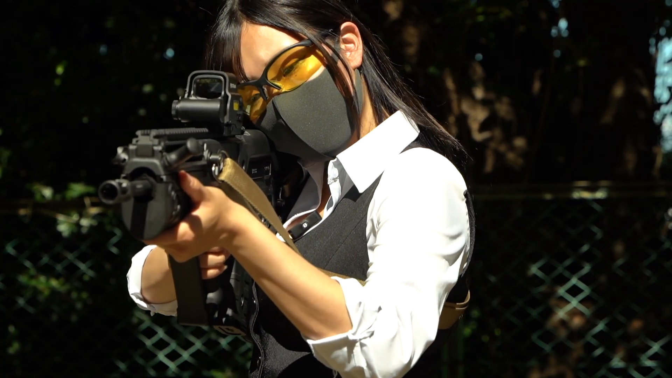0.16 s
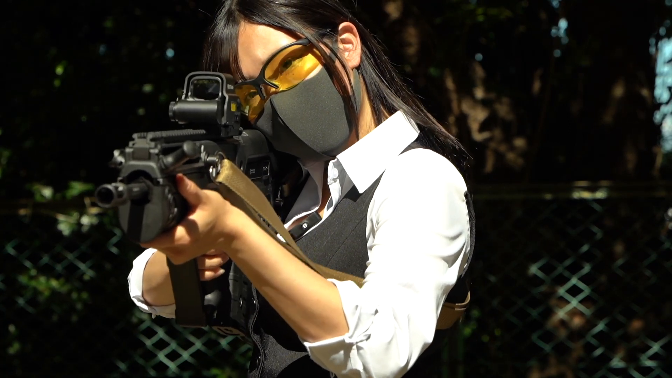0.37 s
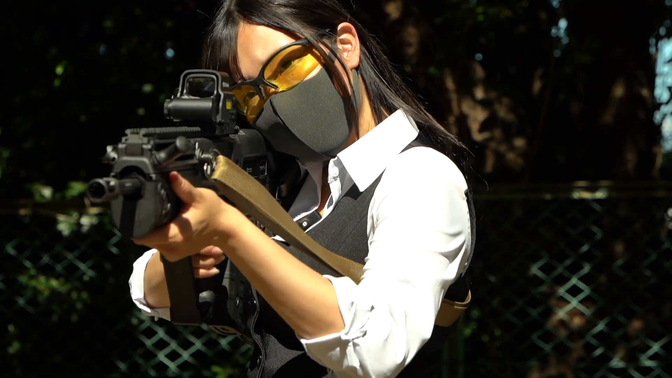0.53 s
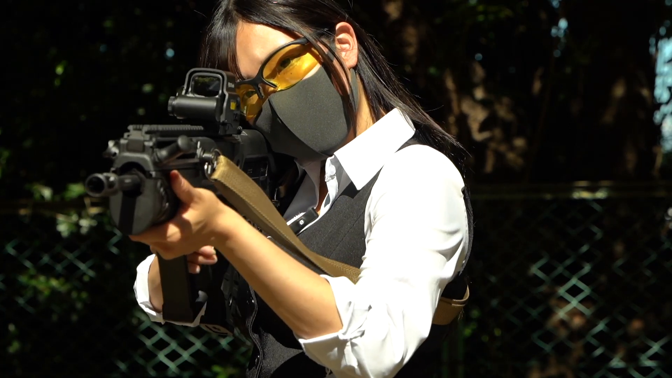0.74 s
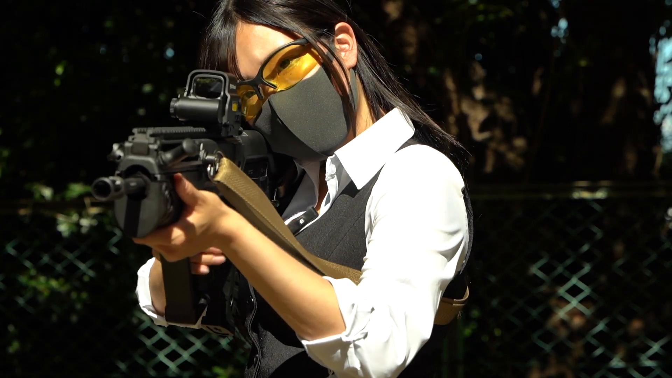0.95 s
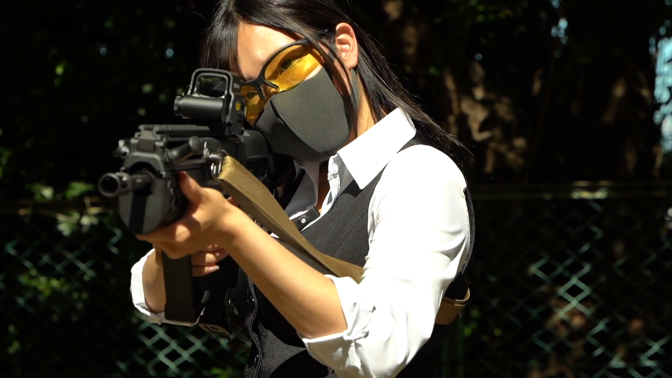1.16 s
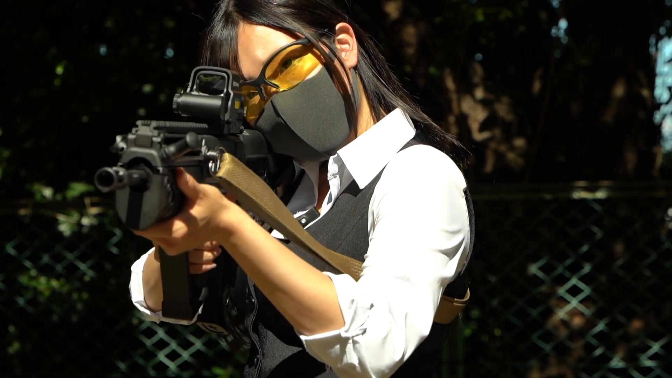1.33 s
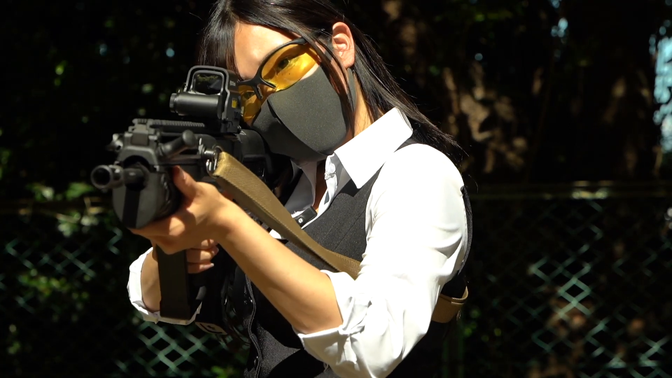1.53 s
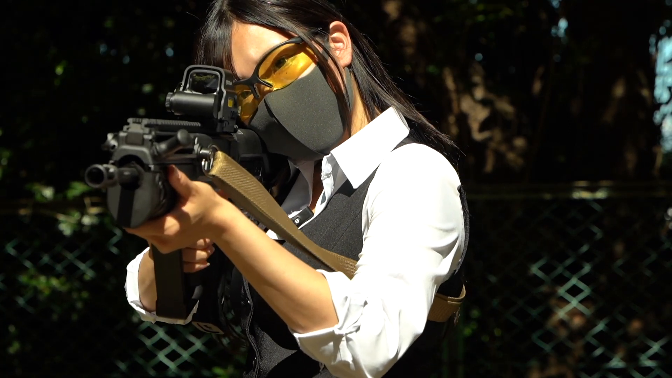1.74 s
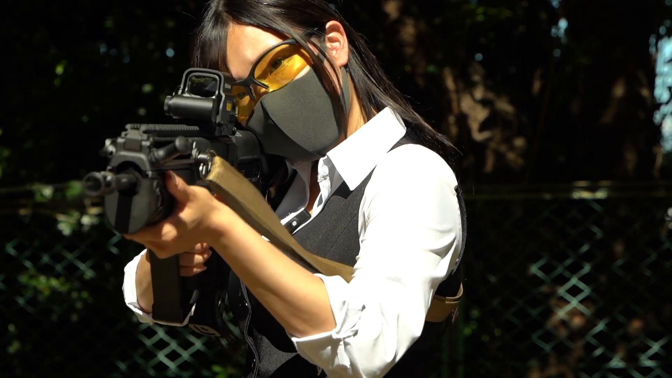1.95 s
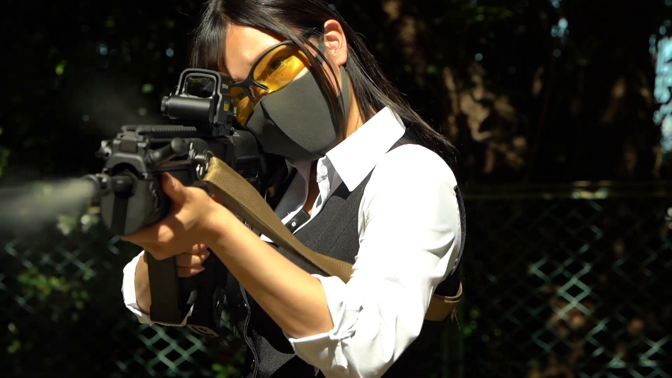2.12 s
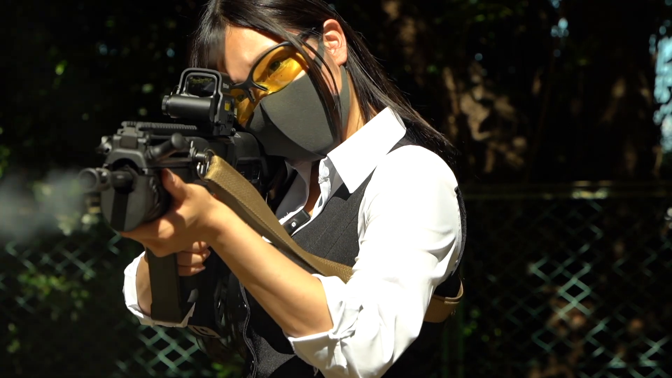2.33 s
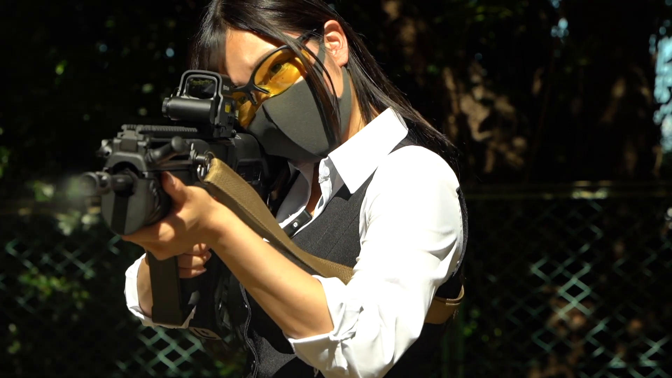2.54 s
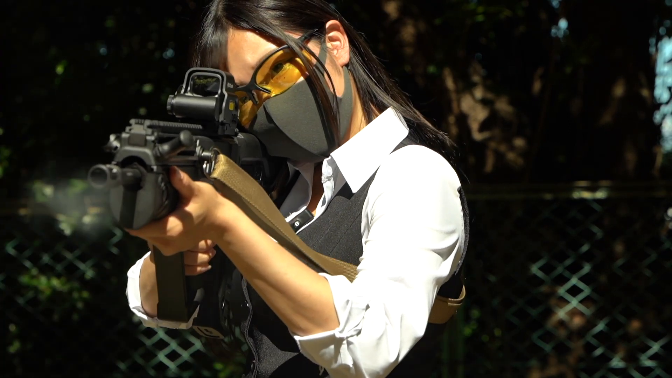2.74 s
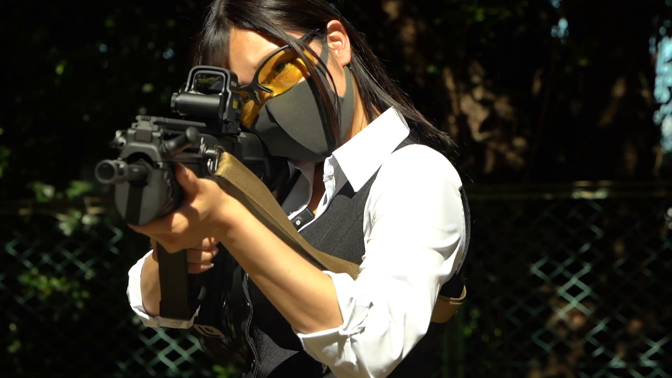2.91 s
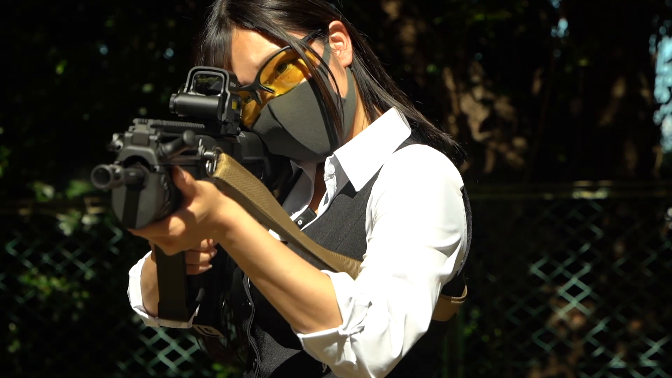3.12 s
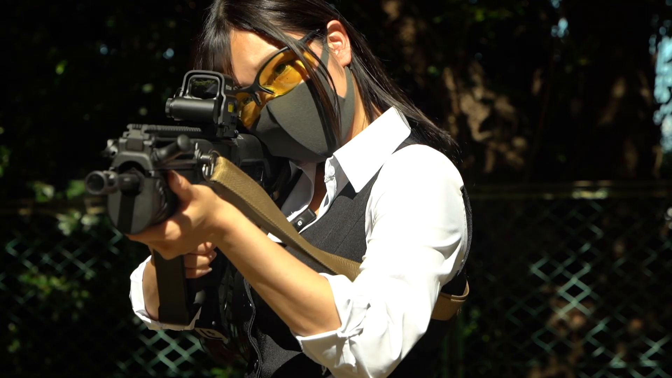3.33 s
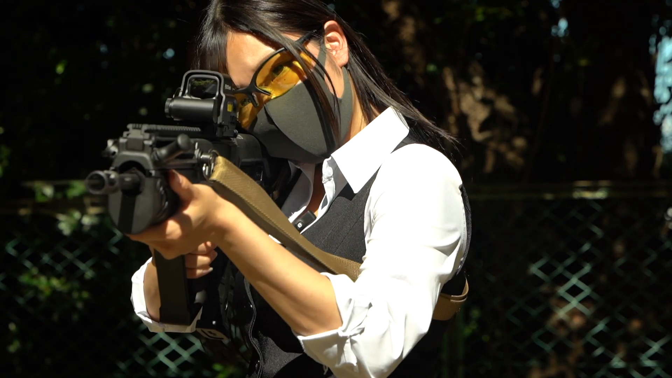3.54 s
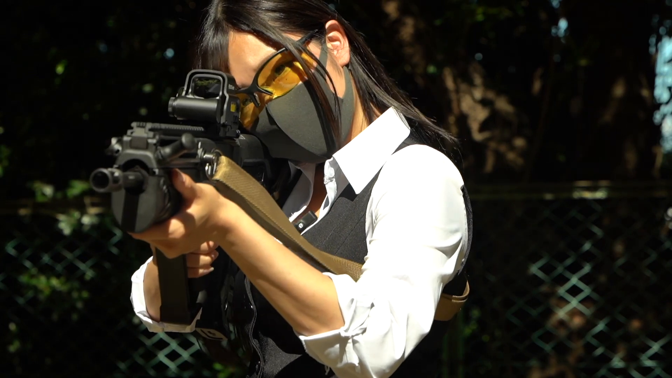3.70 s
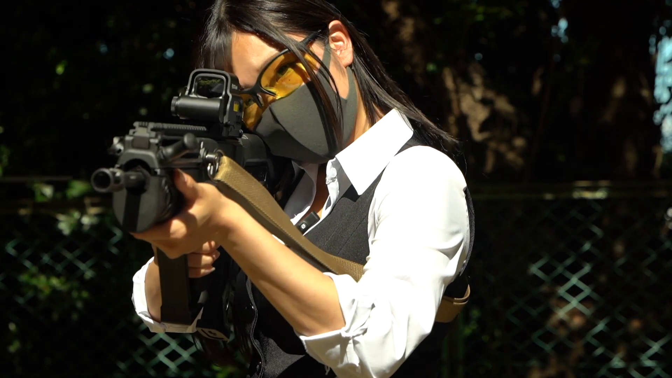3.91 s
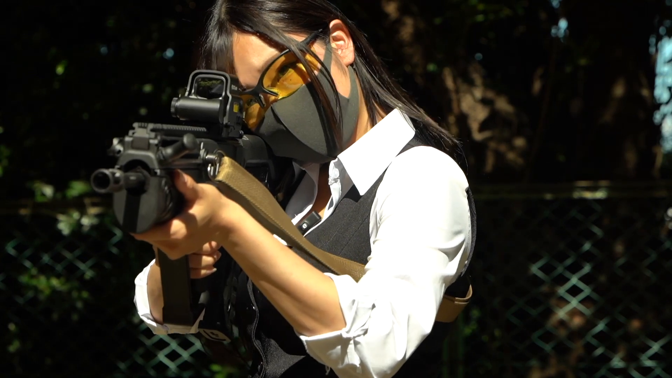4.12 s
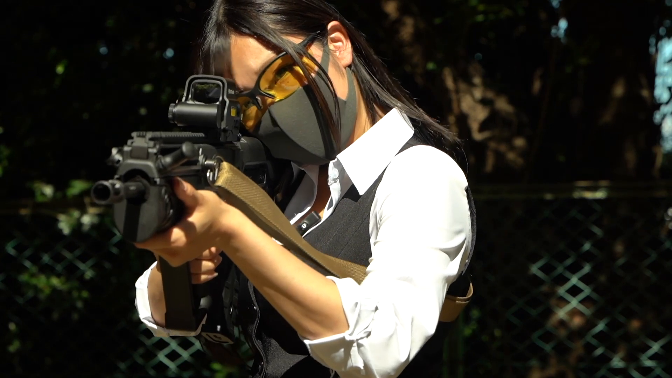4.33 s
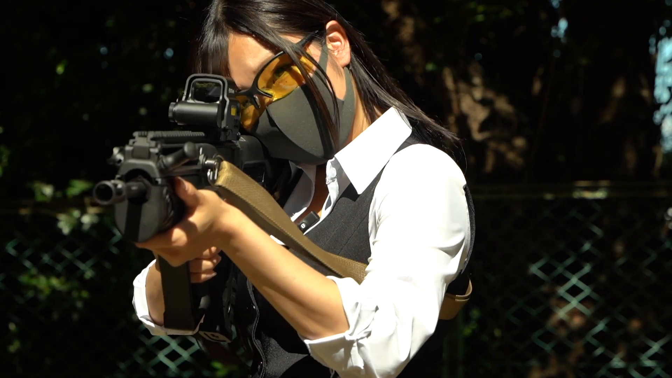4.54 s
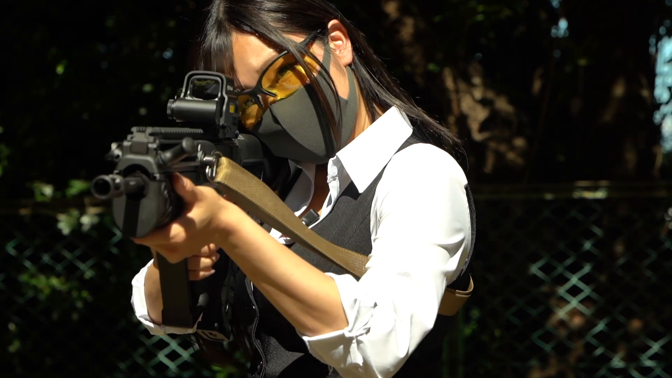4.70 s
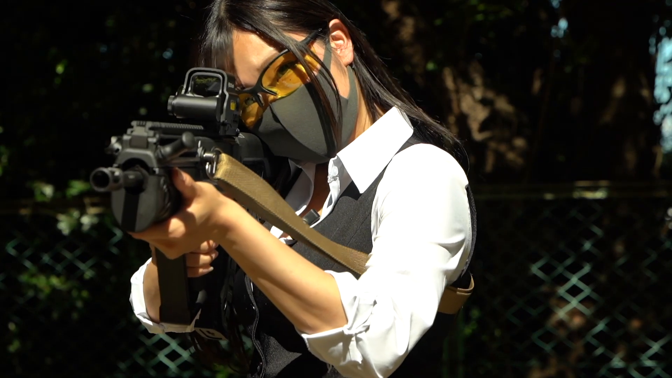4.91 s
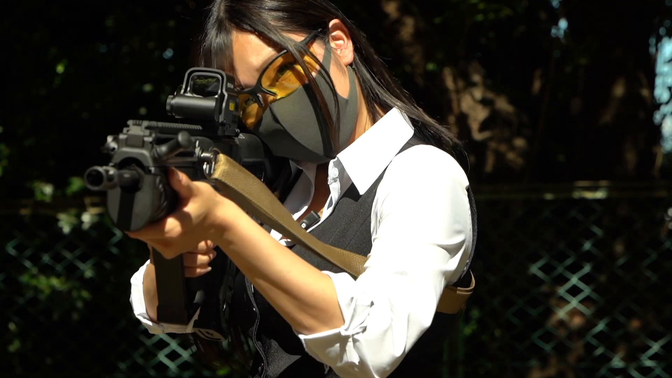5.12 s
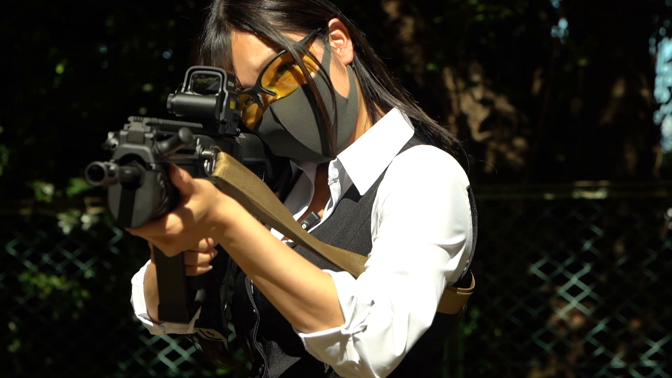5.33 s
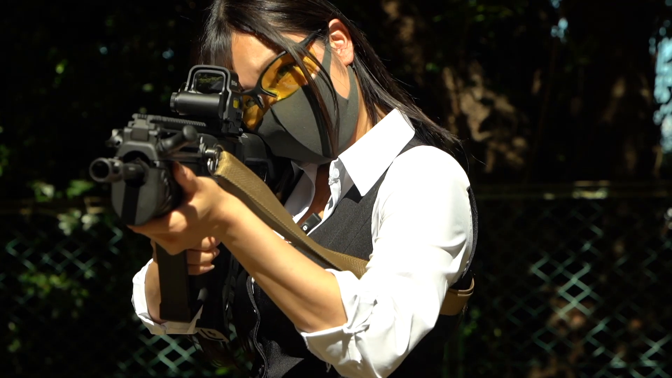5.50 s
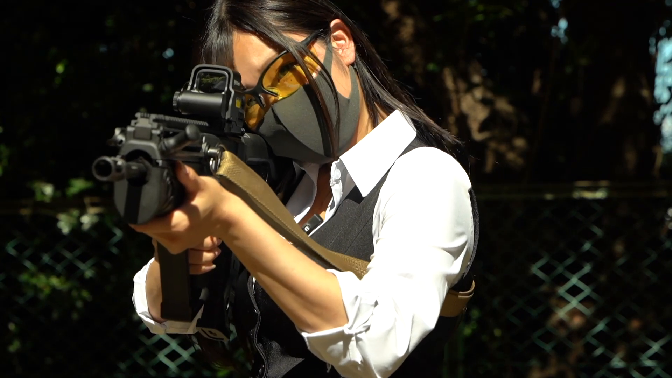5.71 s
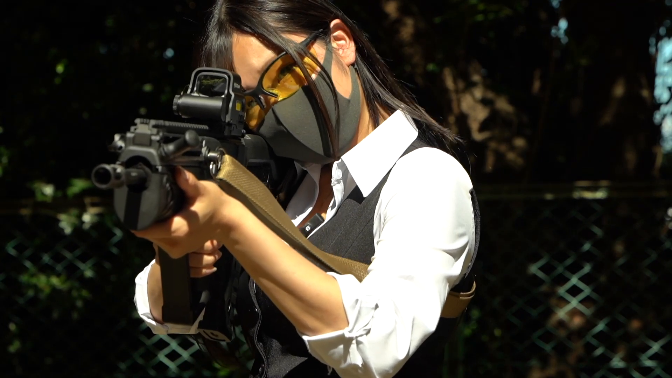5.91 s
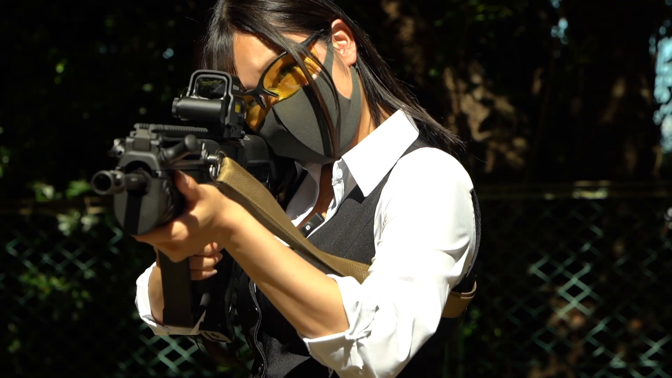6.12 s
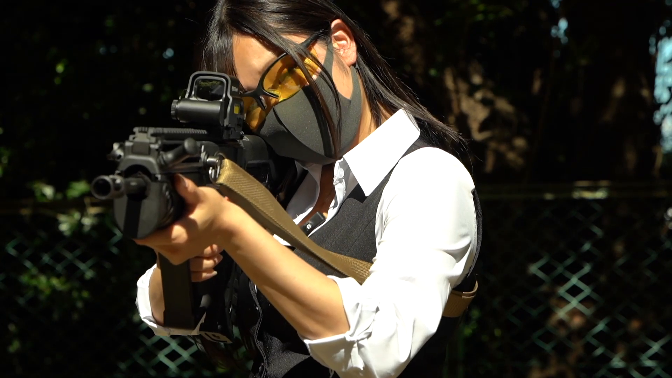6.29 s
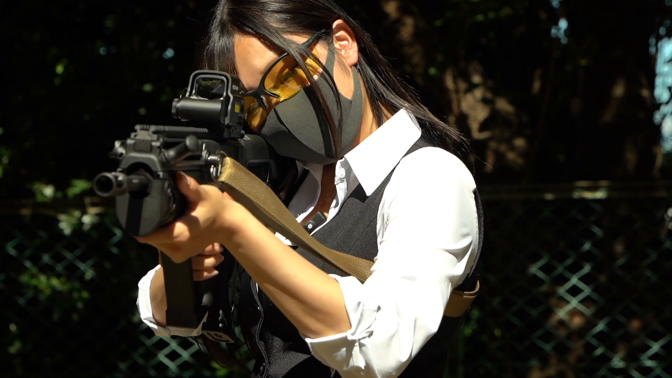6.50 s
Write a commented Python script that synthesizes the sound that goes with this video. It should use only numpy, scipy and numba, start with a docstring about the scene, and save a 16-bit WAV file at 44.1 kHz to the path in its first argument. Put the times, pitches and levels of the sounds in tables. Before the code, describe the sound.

Cicadas hiss high and steady in a wood throughout, over a faint low murmur of distant air; one lower cicada stops at about 1.3 seconds. From 0.4 seconds, clothes rustle lightly and an airsoft gas rifle clicks softly as it is handled, with a dull bump near 1 second. At about 1.9 seconds the trigger clicks and the rifle fires one long, loud, close burst, roughly thirteen shots a second. Each shot is a hollow mechanical clatter with a puff of gas and a thin ringing spring, briefly echoed by the trees. The opening shots overload, then the whole sound drops in level, cicadas included. The firing gradually slows to about ten shots a second, its clacks spreading apart, and stops at 6.2 seconds. A small click and soft bump follow near 6.5 seconds while the quieter cicadas slowly begin to recover.

```python
"""Airsoft burst among cicadas

In a wood full of cicadas, a gas blowback airsoft rifle is handled, then fires one long, close burst.
Every shot is a chain of blows on the gun's hollow body, with puffs of gas and a singing spring.
As the gas chills, the bolt (the sliding part inside) slows and the blows draw apart.
The trees echo briefly. The burst overloads the recorder, which turns itself down and recovers slowly."""
import sys
import numpy as np
from scipy import signal
from scipy.fft import rfft, irfft, next_fast_len
from scipy.io import wavfile
from scipy.ndimage import uniform_filter1d
from numba import njit

SR = 44100
rng = np.random.default_rng(int(sys.argv[2]) if len(sys.argv) > 2 else 0)


def transcribe(signal):
    """Save signal, clipped to [-1, 1], as a 16-bit WAV file at the path in sys.argv[1]."""
    frames = np.atleast_2d(signal).T
    limited = np.clip(frames, -1, 1)
    pcm = np.round(limited * 32767).astype(np.int16)
    wavfile.write(sys.argv[1], SR, pcm)


N = 293435


def undb(db):
    """Turn decibels into a factor to multiply by."""
    return 10 ** (np.asarray(db) / 20)


def colour(x, spectrum):
    """Make some pitches louder and others softer; white noise keeps its power."""
    hz, db = np.transpose(spectrum)
    size = next_fast_len(x.shape[-1], real=True)
    gain = undb(np.interp(np.log(np.fft.rfftfreq(size, 1 / SR) + 1), np.log(hz), db))
    return irfft(rfft(x, size) * gain / np.sqrt(np.mean(gain ** 2)), size)[..., :x.shape[-1]]


def place(sounds, times, db):
    """Lay one short sound at each time, each at its own level."""
    out = np.zeros(N + sounds.shape[1])
    for sound, s, gain in zip(sounds, times, undb(db)):
        start = int(np.clip(s * SR, 0, N))
        out[start:start + len(sound)] += gain * sound
    return out[:N]


def hiss(spectrum, levels, waver_db, waver_hz):
    """Many small sounds merge into a hiss whose level wavers at random."""
    noise = colour(rng.standard_normal(N), spectrum)
    db = np.interp(np.arange(N) / SR, *np.transpose(levels))
    hold = int(SR / waver_hz)
    steps = np.repeat(rng.standard_normal(N // hold + 1), hold)
    waver = 1.3 * uniform_filter1d(uniform_filter1d(steps, hold), hold)[:N]
    return noise * undb(db + waver_db * waver)


# The chorus and one lower cicada: tone (pitch [Hz], level [dB]), loudness (time [s], level [dB])
CHORUS_TONE = [(3500, -42), (5000, -32), (6000, -20), (7000, -8), (7900, 0), (8500, -2), (9300, -10.5),
               (10300, -22), (11500, -34), (12700, -35), (13700, -31), (16000, -39)]
CHORUS_LOUDNESS = [(0, -21.5), (.5, -21.7), (.9, -22.6), (1.3, -21.8), (1.8, -20), (6.6, -20.3)]
LOW_CICADA_TONE = [(4400, -35), (5100, -12), (5500, -1), (5850, 0), (6400, -6), (7200, -30)]
LOW_CICADA_LOUDNESS = [(0, -38), (1.17, -38), (1.3, -65)]
def cicadas():
    """Many cicadas blend into a high hiss; a lower one stops early."""
    chorus = hiss(CHORUS_TONE, CHORUS_LOUDNESS, waver_db=.4, waver_hz=20)
    return chorus + hiss(LOW_CICADA_TONE, LOW_CICADA_LOUDNESS, waver_db=.7, waver_hz=15)


# The far murmur: tone (pitch [Hz], level [dB]), loudness (time [s], level [dB])
AIR_TONE = [(25, -8), (50, -3), (80, 1), (125, -3), (170, -8), (320, -9), (600, -10), (850, -17),
            (1150, -28), (3400, -31), (5000, -45), (8000, -70)]
AIR_LOUDNESS = [(0, -36), (.4, -38), (.55, -34), (.92, -33), (1.15, -39), (1.45, -41), (1.6, -37),
                (1.8, -35), (6.65, -37)]
def distant_air():
    """Air and faraway traffic make a low murmur."""
    return hiss(AIR_TONE, AIR_LOUDNESS, waver_db=1.7, waver_hz=18)


# The rustle: tone (pitch [Hz], level [dB]), loudness (time [s], level [dB])
CLOTH_TONE = [(200, -12), (550, 0), (1100, -10), (3000, -12), (4500, -19), (9000, -30)]
CLOTH_LOUDNESS = [(0, -45), (.42, -47), (.52, -34), (.76, -36), (.95, -42), (1.25, -44), (1.4, -54),
                  (1.72, -42), (1.9, -60)]
def clothes():
    """Clothes rustle as the aim settles."""
    return hiss(CLOTH_TONE, CLOTH_LOUDNESS, waver_db=1.7, waver_hz=60)


def ring(force, notes, pitch=1, hardness_hz=SR / 2):
    """A struck object rings at its own notes. Wide notes die sooner; a soft hit sounds duller."""
    f = np.fft.rfftfreq(force.shape[-1], 1 / SR) / pitch
    response = sum(undb(db) * width * f / (width * f + 1j * (f ** 2 - hz ** 2))
                   for hz, width, db in notes)
    response = response / (1 + 1j * f / hardness_hz) ** 2
    return irfft(rfft(force) * response / np.sqrt(np.mean(np.abs(response) ** 2)), force.shape[-1])


# Notes of the gun's hollow body and its steel parts: (base pitch [Hz], width [Hz], level [dB])
BODY_NOTES = [(290, 130, -20), (470, 110, -17), (570, 90, -7), (715, 62, 0), (785, 64, 0), (1000, 170, -8),
              (1350, 400, -16)]
STEEL_NOTES = [(1750, 500, -11), (2220, 260, 0), (2560, 320, -2), (3100, 450, -10), (3900, 700, -10),
               (5600, 900, -11), (6500, 700, -10.5)]
# The sharp part of a blow: (pitch [Hz], level [dB])
CRACK_TONE = [(100, -10), (1000, -2), (4000, 0), (7500, 0), (12000, -8), (16000, -13)]
def blows(times, db, scrape_s, steel_db, crack_db, pitch, hardness_hz, rattle_db=-23, rattle_s=.019):
    """A clean hit, a dying scrape and a faint rattle of loose parts ring the body and the steel."""
    t = np.arange(4096) / SR
    rattle_fade = np.exp(-t / rattle_s)
    fade = np.exp(-t / scrape_s) + undb(rattle_db) * rattle_fade
    grit = fade * rng.standard_normal((len(times), len(t)))
    hit = .42 * np.sqrt(scrape_s * SR / 2) * (t == 0)
    # the moving bolt changes the hollow, so no two blows ring quite alike
    pitch = pitch * (1 + .02 * rng.standard_normal((len(times), 1)))
    body = ring(hit + grit, BODY_NOTES, pitch, hardness_hz)
    steel = undb(steel_db) * ring(hit + grit, STEEL_NOTES, pitch, hardness_hz)
    crack = undb(crack_db) * colour(grit, CRACK_TONE) * rattle_fade
    return place(body + steel + crack, times, db)


# Small clicks of the gun: (time [s], level [dB], steel ring [dB])
CLICKS = [(.352, -33, 4), (.363, -33, 2), (.432, -17.5, -3), (.439, -22, -5), (.447, -26, -8),
          (.488, -27, -14), (.5005, -17, 2), (.7235, -19, 1), (1.536, -30, -5), (1.789, -20, -22),
          (1.862, -10, 10), (6.469, -22, 0)]
def handling():
    """The gun clicks softly as it is handled and its trigger is pulled."""
    times, db, steel_db = np.transpose(CLICKS)
    return blows(times, db, scrape_s=.0018, steel_db=steel_db[:, None], crack_db=-30,
                 pitch=1.08, hardness_hz=2500)


# What the trees send back: (pitch [Hz], level [dB])
ECHO_TONE = [(80, -8), (350, -1), (720, -8), (1100, 2), (2400, -5), (3800, -4), (5000, -6), (8000, -8),
             (15000, -8)]
def tree_echo(x, echo_db=-22.5, spread_s=.11, tail_db=-22, tail_s=.15):
    """Nearby trunks scatter the sound for a moment; the wood behind adds a faint tail."""
    t = np.arange(SR * 3 // 4) / SR
    trunks = t / spread_s * np.exp(-(t / spread_s) ** 2)
    tail = undb(tail_db) * np.exp(-t / tail_s)
    echo = (trunks + tail) * rng.standard_normal(len(t))
    return undb(echo_db) * colour(signal.oaconvolve(x, echo / np.linalg.norm(echo))[:N], ECHO_TONE)


# Low notes of a thump: (pitch [Hz], width [Hz], level [dB])
THUMP_NOTES = [(155, 45, -3), (210, 70, 0), (400, 130, -7)]
def thump(times, db, push_s=.0006):
    """A soft push makes a short, low boom."""
    t = np.arange(2048) / SR
    push = t * np.exp(-t / push_s)
    boom = ring(push / np.linalg.norm(push), THUMP_NOTES)
    return place(np.tile(boom, (len(times), 1)), times, db)


# Soft bumps: (time [s], level [dB])
STOCK_BUMPS = [(1.056, -22), (6.474, -23)]
def stock_bumps():
    """The back end of the gun bumps against the shooter."""
    return thump(*np.transpose(STOCK_BUMPS))


# The gas cooling down: (time [s], chill [0 warm to 1 cold])
GAS_CHILL = [(1.9, 0), (3.3, .12), (4.2, .3), (4.8, .55), (5.3, .92), (6.2, 1)]
def chill_at(times):
    """How cold the gas is at these times."""
    return np.interp(times, *np.transpose(GAS_CHILL))


def chill_db(times, warm_db, cold_db, scatter_db=0):
    """A level between that of warm and cold gas, plus any random scatter."""
    return warm_db + chill_at(times) * (cold_db - warm_db) + scatter_db * rng.standard_normal(len(times))


# The firing slows down: (time [s], gap between shots [s])
SHOT_GAPS = [(1.87, 0.078), (2.12, 0.078), (2.3, 0.08164), (2.6, 0.08211), (2.9, 0.08616), (3.7, 0.0886),
             (4.45, 0.09621), (4.95, 0.10442), (5.5, 0.10411), (6.0, 0.10313)]
# The cold parts catch twice, so all later shots come late: (time [s], time lost [s])
SNAGS = [(5.3, .006), (5.4, .004)]
# The bolt is kicked back, hits the rear, feeds a pellet and closes:
# blow: (delay after the hammer [s], share of the gap's growth [factor], extra delay when cold [s])
BOLT_TRIP = {"kick": (.0212, .12, .0024), "rear": (.033, .6, .009), "feed": (.0625, .45, .0015),
             "close": (.0743, 1.12, -.007)}
def blow_times(first_s=1.866, stop_s=6.21, slop_s=.0004):
    """When each blow lands: one shot sets off the next, and a slower bolt spreads its blows apart."""
    shots, gap = [first_s], lambda s: np.interp(s, *np.transpose(SHOT_GAPS))
    while shots[-1] + gap(shots[-1]) < stop_s:
        shots.append(shots[-1] + gap(shots[-1]))
    shots = np.array(shots)
    hammer = shots + sum(lost * (shots > s) for s, lost in SNAGS)
    growth = gap(shots) - gap(first_s)
    at = {"hammer": hammer, "valve": hammer + .0145, "spring": hammer + .049}
    for kind, (delay, share, cold_delay) in BOLT_TRIP.items():
        slop = slop_s * rng.standard_normal(len(shots))
        at[kind] = hammer + delay + share * growth + cold_delay * chill_at(shots) + slop
    at["gas"] = at["kick"] + .007  # a puff follows the kick
    at["slide"] = at["feed"] + .0065  # the bolt slides home
    return {kind: times[times < stop_s] for kind, times in at.items()}


# The blows of one shot. blow: (warm level [dB], cold level [dB], scrape fade [s], steel ring [dB],
# crack [dB], pitch [factor], hardness of the hit [Hz])
SHOT_BLOWS = { "close": (11, 20, .0022, -4, -9, 1.1, 7000), "hammer": (24, 17, .0032, -2, 1.5, 1.03, 9000),
              "valve": (13.5, 10.5, .004, 2, -7, 1.04, 7000), "kick": (20.5, 21, .0032, -2, 2, 1, 9000),
              "gas": (14, 10.5, .007, -5, -2, .98, 6000), "rear": (15.5, 21, .0026, -2, -7, 1.02, 7000),
              "spring": (20.5, 0, .006, 1, -13, 1, 5000), "feed": (13, 18, .0011, -14, -30, 1.07, 2800),
              "slide": (6, 4, .008, -9, -27, 1.04, 4500), }
def clatter(at, warm_pitch=.98, cold_pitch=1.02, bass_cut_hz=200):
    """Moving parts strike the gun's body, which is too small to give off much bass."""
    out = 0
    for kind, (warm_db, cold_db, scrape_s, steel_db, crack_db, pitch, hardness_hz) in SHOT_BLOWS.items():
        rise = warm_pitch + (cold_pitch - warm_pitch) * chill_at(at[kind])[:, None]
        db = chill_db(at[kind], warm_db, cold_db, scatter_db=1.5)
        out = out + blows(at[kind], db, scrape_s, steel_db, crack_db, pitch * rise, hardness_hz)
    return signal.sosfilt(signal.butter(2, bass_cut_hz, "high", fs=SR, output="sos"), out)


# Escaping gas. blow: (warm level [dB], cold level [dB], length [s])
GAS_CHIRPS = {"hammer": (20, 12, .009), "kick": (19, 10, .012)}
def gas_chirps(at, start_hz=1400, fall_s=.006):
    """The pocket of gas widens behind the moving parts, so its pitch drops very fast."""
    t, out = np.arange(1024) / SR, 0
    for kind, (warm_db, cold_db, length_s) in GAS_CHIRPS.items():
        db = chill_db(at[kind], warm_db, cold_db)
        hz = start_hz * (1 + .07 * rng.standard_normal((len(db), 1))) * np.exp(-t / fall_s)
        swell = np.sin(np.pi * np.minimum(t / length_s, 1))
        chirps = swell * np.sin(2 * np.pi * np.cumsum(hz, axis=1) / SR)
        out = out + place(chirps, at[kind], db)
    return out


# Blows that push air. blow: (warm level [dB], cold level [dB], delay after the blow [s])
AIR_PUSHES = {"hammer": (11, 5, .004), "kick": (17, 14.5, .006), "rear": (11, -3, .003)}
def gas_booms(at):
    """Gas leaving the gun shoves the air with a low thump."""
    return sum(thump(at[kind] + delay, chill_db(at[kind], warm_db, cold_db, scatter_db=.8))
               for kind, (warm_db, cold_db, delay) in AIR_PUSHES.items())


# Notes of the spring that returns the bolt: (pitch [Hz], width [Hz], level [dB])
SPRING_NOTES = [(5500, 500, -3), (6500, 450, 0), (12950, 110, 0)]
def spring_song(times, warm_db, cold_db, fade_s, size=4096):
    """The jolted spring sings on thinly between the shots."""
    shiver = np.exp(-np.arange(size) / SR / fade_s) * rng.standard_normal((len(times), size))
    return place(ring(shiver, SPRING_NOTES), times, chill_db(times, warm_db, cold_db))


def rifle():
    """One burst: clatter, gas and spring all follow the chill of the gas."""
    at = blow_times()
    return (clatter(at) + gas_chirps(at) + gas_booms(at)
            + spring_song(at["kick"], warm_db=-12, cold_db=3, fade_s=.02)
            + spring_song(at["spring"], warm_db=-7, cold_db=-14, fade_s=.035))


def scene():
    """The gun and its echo, over cicadas, distant air and clothes."""
    gun = rifle() + handling() + stock_bumps()
    background = cicadas() + distant_air() + clothes()
    return (gun + tree_echo(gun) + background)[None]


@njit
def follow(x, rise_s, fall_s):
    """Follow a level smoothly, rising at one speed and falling at another."""
    out, level = np.empty(len(x)), 0.
    for i in range(len(x)):
        level += (x[i] - level) / (SR * (rise_s if x[i] > level else fall_s))
        out[i] = level
    return out


def record(dry, turn_down_db=-17, ceiling=.51, bass_cut_hz=62, treble_cut_hz=15900):
    """Overload turns the recorder down for seconds; peaks still get cut flat, then pressed lower."""
    overload = follow(1. * (np.abs(dry[0]) > 1), rise_s=.003, fall_s=1.5)
    clipped = np.clip(dry[0] * undb(turn_down_db * overload), -1, 1)
    level = follow(np.abs(clipped), rise_s=.0016, fall_s=.024)
    pressed = clipped * ceiling / np.maximum(level, ceiling)
    pressed = signal.sosfilt(signal.butter(2, bass_cut_hz, "high", fs=SR, output="sos"), pressed)
    return signal.sosfilt(signal.ellip(10, .2, 70, treble_cut_hz, fs=SR, output="sos"), pressed)[None]


dry = scene()
out = record(dry)
transcribe(out)
```